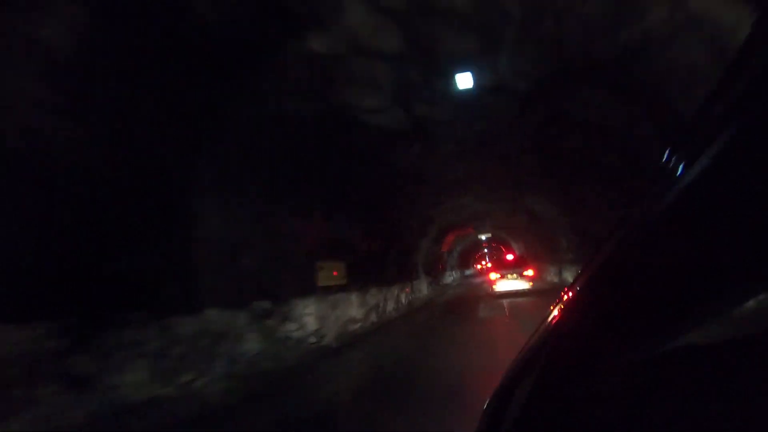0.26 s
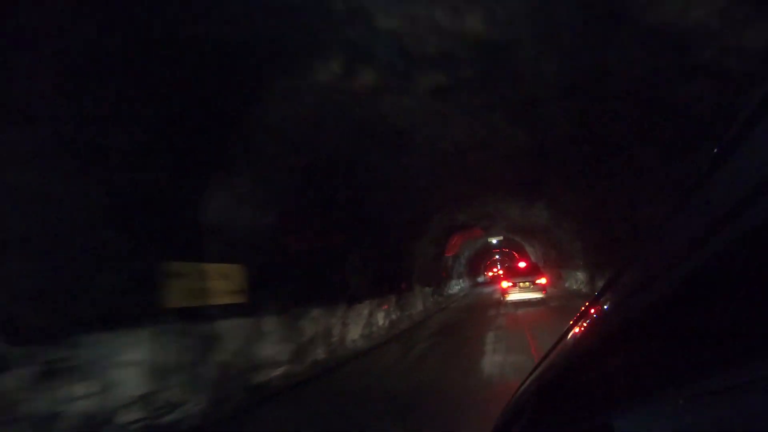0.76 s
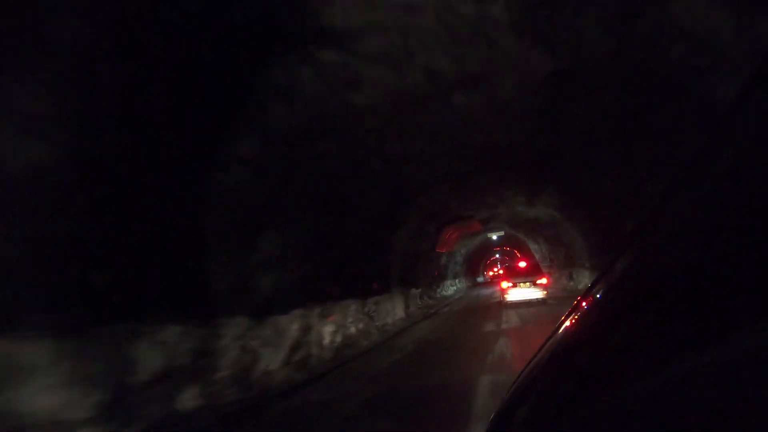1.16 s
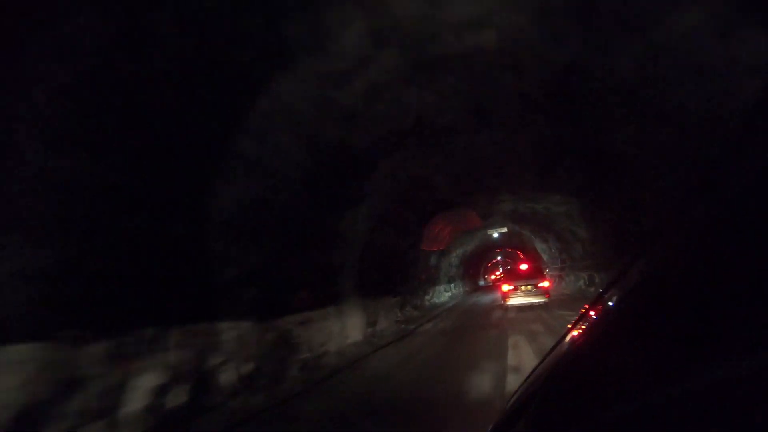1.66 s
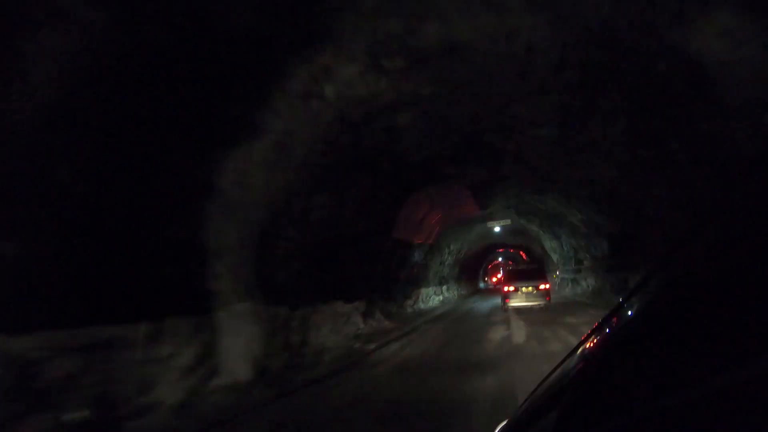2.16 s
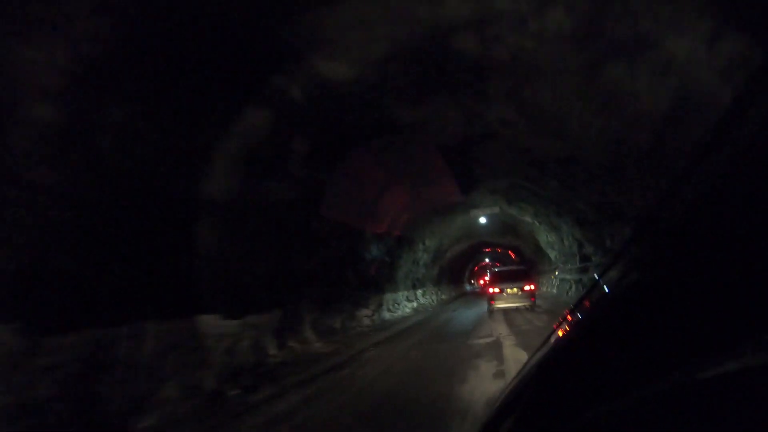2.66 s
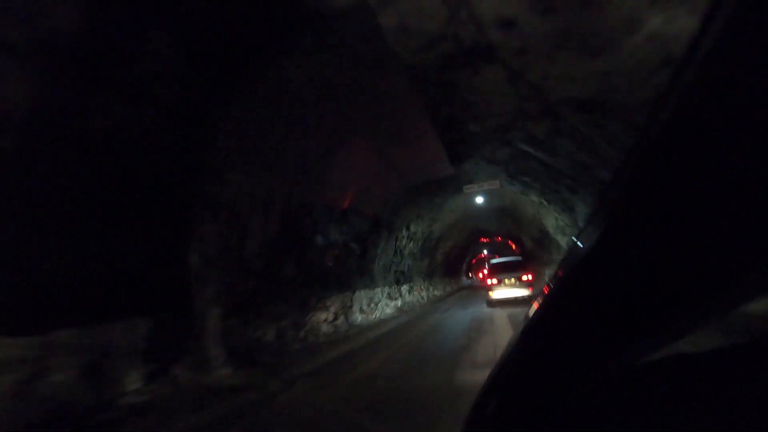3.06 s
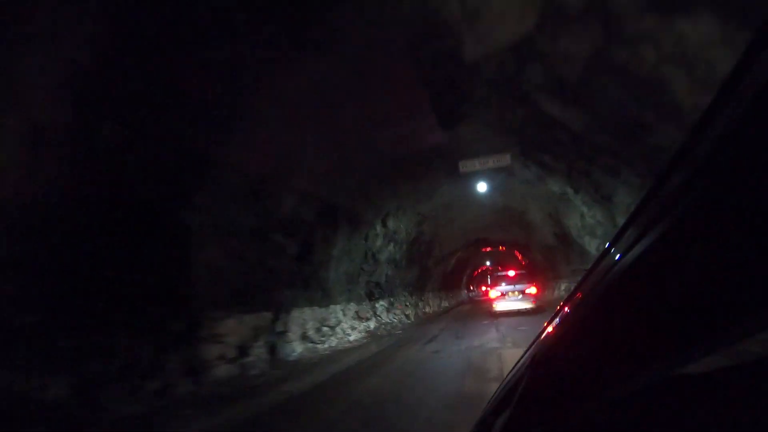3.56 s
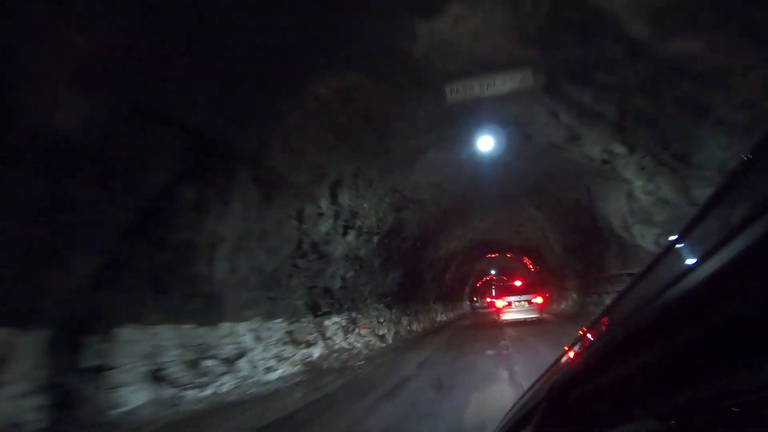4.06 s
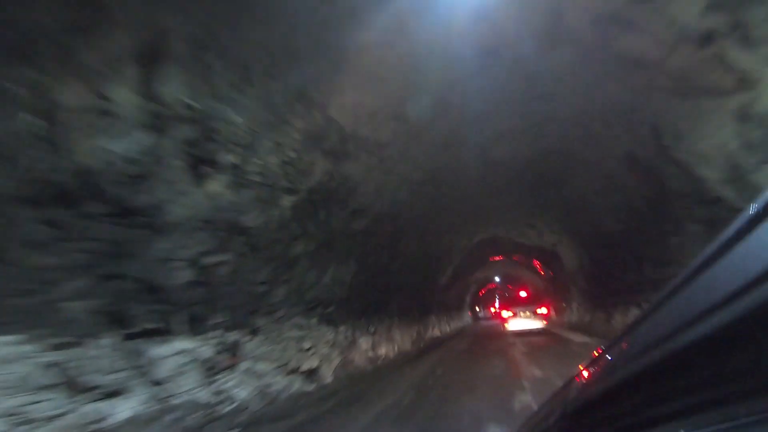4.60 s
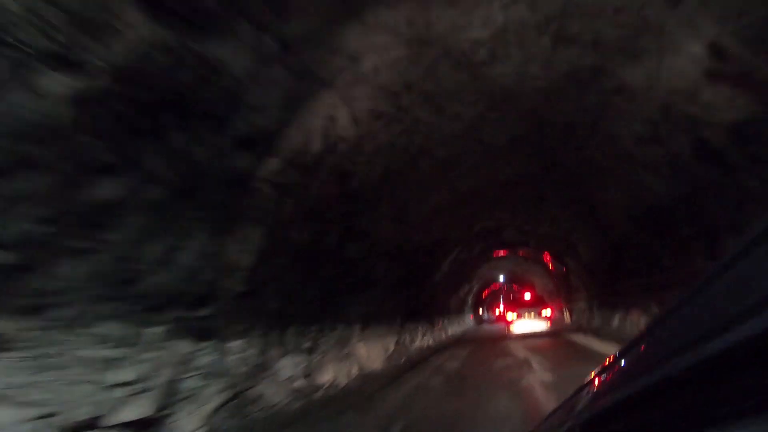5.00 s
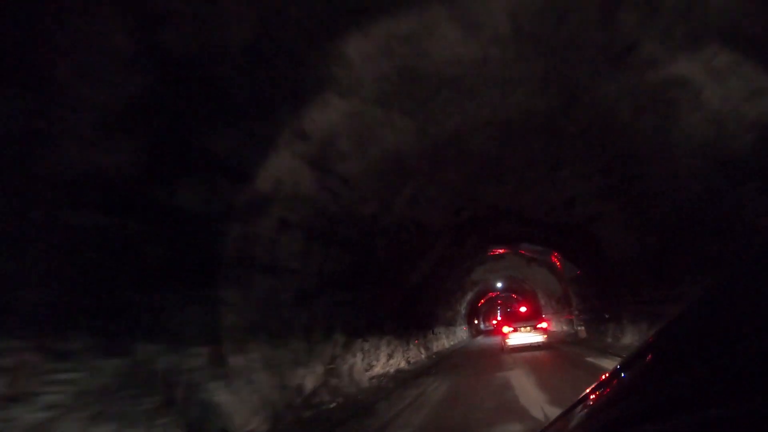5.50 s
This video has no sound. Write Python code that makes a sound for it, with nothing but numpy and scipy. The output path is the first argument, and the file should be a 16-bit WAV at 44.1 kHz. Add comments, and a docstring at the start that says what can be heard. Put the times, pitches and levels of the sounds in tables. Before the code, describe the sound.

Wind rumbles and flutters on a microphone held out of a car's side window, with irregular gusts landing as low slaps. Beneath it, tyre and engine noise blend into a smooth, steady roar inside a rock tunnel, stronger on the right. Water hisses softly under the wheels, and a few faint ticks of grit and spray hit the body. A thin, high whistle comes and goes.

```python
"""Wind buffets the two microphone ports of a small camera held out of a car's side window.
The car rolls slowly through a wet rock tunnel: the walls diffuse tyre and engine roar, water
hisses under the wheels, and grit and spray strike the body. A thin whistle from the drive train
comes and goes. The camera body shades the left port. Stereo pairs are ordered left, right;
pan is the left level minus the right."""
import sys
import numpy as np
from scipy import signal
from scipy.fft import rfft, irfft
from scipy.io import wavfile
from scipy.ndimage import uniform_filter1d

SR = 44100
rng = np.random.default_rng(int(sys.argv[2]) if len(sys.argv) > 2 else 0)


def output_pcm(signal):
    """Save a mono or channel-first signal as 16-bit PCM at the path in sys.argv[1].

    Samples are clipped to [-1, 1] before scaling.
    """
    pcm = np.clip(np.atleast_2d(signal).T, -1, 1) * 32767
    wavfile.write(sys.argv[1], SR, np.round(pcm).astype(np.int16))


N = 253134
TIME = np.arange(N) / SR
HZ = np.fft.rfftfreq(N, 1 / SR) + 1e-9

# grit and spray flung against the body: t/s, grit level/dB, grit pan/dB, spray level/dB
THROWS = [(0.5205, -40, 0, -60), (0.5265, -46, 0, -70), (0.692, -50, 0, -66), (0.94, -52, 0, -64),
          (1.088, -52, 0, -67), (1.232, -52, 0, -67), (1.755, -52, 0, -68), (4.1234, -54, 4, -85),
          (4.7294, -49, -2.5, -73), (5.1557, -50, -4.0, -62), (5.5144, -50, -2, -66)]


def from_db(db):
    """Amplitude ratio: a factor of ten for every 20 dB."""
    return 10 ** (np.asarray(db) / 20)


def in_time(rows):
    """Linear interpolation of each column over t/s, one value a sample."""
    times, *columns = np.transpose(rows)
    return [np.interp(TIME, times, column) for column in columns]


def in_frequency(rows):
    """Interpolation of each column over the logarithm of f/Hz, one value a bin."""
    hz, *columns = np.transpose(rows)
    return [np.interp(np.log(HZ), np.log(hz), column) for column in columns]


def drift(rate_hz):
    """Random modulation: low-passed noise of unit standard deviation."""
    slow = irfft(rfft(rng.standard_normal(N)) / (1 + (HZ / rate_hz) ** 2), N)
    return slow / np.std(slow)


def swells(times, peaks_db, width_s):
    """Superposition of Gaussian envelopes."""
    return sum(from_db(db) * np.exp(-((TIME - at) / width_s) ** 2) for at, db in zip(times, peaks_db))


def resonance(hz, width_hz):
    """Lorentzian curve: the gain of a resonance passed twice."""
    return 1 / (1 + (2 * (HZ - hz) / width_hz) ** 2)


def port_noise(spectrum, pan_db, coherence, left_lag_rad=0):
    """Partially coherent noise at the two ports; the mean of the pair has rms 1."""
    shared, own = rfft(rng.standard_normal((2, N)))
    coherence = np.clip(coherence, 0, 1)
    left = coherence * shared * np.exp(-1j * left_lag_rad) + np.sqrt(1 - coherence ** 2) * own
    pair = irfft(spectrum * np.array([from_db(pan_db) * left, shared]), N)
    return pair / np.std(pair.mean(axis=0))


def evened(pair, window_s):
    """Compression: dividing by a running rms reduces the chance swells of a noise."""
    window = int(window_s * SR)
    power = uniform_filter1d(uniform_filter1d(pair.mean(axis=0) ** 2, window), window)
    return pair / np.sqrt(power + 0.12)


def puff():
    """Narrow-band noise: a brief soft hiss, nearly in antiphase at the two ports."""
    # the hiss band: start t/s, end t/s, f/Hz, width/Hz, level/dB
    bands = [(3.49, 3.62, 7900, 550, -63)]
    out = np.zeros((2, N))
    for start, end, hz, width_hz, db in bands:
        progress = np.clip((TIME - start) / (end - start), 0, 1)
        swell = np.sqrt(np.clip(np.sin(np.pi * progress), 0, 1))
        out += from_db(db) * swell * port_noise(resonance(hz, width_hz), 0, 0.8, left_lag_rad=2.4)
    return out


def grit():
    """Impulse response: each grain sets the damped modes of a body panel ringing."""
    # panel modes: f/Hz, relative level/dB, T60/s
    modes = [(5500, -5, .015), (6600, -5, .01), (9800, -9, .006), (12300, -17, .004)]
    times, peak_db, pan_db, _ = np.transpose(THROWS)
    out = np.zeros((2, N))
    for hz, mode_db, t60 in modes:
        impacts = np.zeros((2, N)) + 1e-18
        impacts[:, (times * SR).astype(int)] = from_db(peak_db + mode_db + np.outer([.5, -.5], pan_db))
        decay, angle = from_db(-60 / (t60 * SR)), 2 * np.pi * hz / SR   # per sample
        out += signal.lfilter([0, np.sin(angle)], [1, -2 * decay * np.cos(angle), decay ** 2], impacts)
    return out


def spray_envelope(t60_s=0.6):
    """Exponential decay: each throw starts a hiss at once, which then dies away."""
    return sum((TIME > at) * from_db(db - 60 * np.abs(TIME - at) / t60_s) for at, _, _, db in THROWS)


def drive_train_whistle():
    """Common amplitude modulation: breathy partials of narrow-band noise swell and flare together."""
    # partials: f/Hz, width/Hz, relative level/dB, pan/dB
    partials = [(3146, 23, 3, -14), (1574, 10, -3, -12), (3705, 8, -17, -10), (6050, 60, -27, -8)]
    # slow course of the whistle: t/s, level/dB
    course = [(0.0, -53.5), (0.45, -55.5), (0.85, -65), (1.05, -53.5), (1.6, -55), (1.8, -63), (2.2, -55),
              (2.5, -61), (2.85, -64), (3.15, -61), (3.48, -57), (3.72, -55), (3.88, -51), (4.03, -61),
              (4.3, -54), (4.45, -57.5), (4.68, -62), (5.05, -57), (5.3, -63), (5.74, -54)]
    # short flares: t/s, peak level/dB
    flares = [(0.73, -56), (1.21, -63), (2.65, -55), (3.378, -51), (3.582, -56), (3.632, -56), (3.815, -56),
              (4.085, -55), (4.165, -50), (4.495, -56), (4.595, -49), (4.745, -59), (4.845, -46.5),
              (4.935, -47), (5.13, -53), (5.27, -53)]
    tones = sum(from_db(db) * evened(port_noise(resonance(hz, width_hz), pan_db, 0.41), window_s=0.021)
                for hz, width_hz, db, pan_db in partials)
    wavering = from_db(in_time(course)[0] + 1.5 * drift(rate_hz=8.8))
    return (wavering + swells(*np.transpose(flares), width_s=0.021)) * tones


def water_hiss(sheen_edge_hz=8500, flicker_db=1.5):
    """Broadband noise of the tearing water film; its top treble, the sheen, flickers."""
    # hiss at the ports: f/Hz, relative right level/dB, pan/dB, coherence, left lag/rad
    bands = [(4400, -0.2, -2.5, 0.52, 0.6), (5000, 0.0, -5.4, 0.58, 2.2), (6300, -3.1, -5.7, 0.35, 2.0),
             (7500, -6.6, -0.3, 0.56, 1.9), (8600, -14.7, 1.0, 0.71, 3.2), (10000, -14.1, -0.9, 0.45, 3.5),
             (11500, -23.0, -3.2, 0.2, 0.3), (13000, -28.0, -5.5, 0.35, 0.1), (14300, -37.0, -6, 0.2, 0.2)]
    # sheen against the rest of the hiss: t/s, relative level/dB
    sheen_course = [(0.0, 0), (0.6, 2.5), (1.9, 1.5), (2.9, -3.5), (3.6, -.6), (4.3, -2.5), (4.9, 0),
                    (5.74, -.6)]
    right_db, *ports = in_frequency(bands)
    hiss = port_noise(from_db(right_db) / np.sqrt(1 + (4500 / HZ) ** 24), *ports)
    sheen = irfft(rfft(hiss) / (1 + (sheen_edge_hz / HZ) ** 12), N)
    sheen_gain = from_db(in_time(sheen_course)[0] + flicker_db * drift(rate_hz=7.0))
    return hiss + (sheen_gain - 1) * sheen


def tunnel_roar(wetness_db, wet_edge_hz=3000):
    """Diffuse reflection smears tyre and engine sound to smooth noise, brighter on wetter road."""
    # roar at the ports: f/Hz, relative right level/dB, pan/dB, coherence, left lag/rad
    bands = [(430, -2.1, -1.4, 0.66, 0.1), (600, -3.3, 0.2, 0.82, 0.6), (770, -0.9, -4.9, 0.84, 1.2),
             (880, 0.0, -9.8, 0.61, 1.3), (980, -0.2, -8.9, 0.09, 1.0), (1100, -2.3, -10.4, 0.6, -0.9),
             (1350, -3.8, -9.0, 0.82, -0.3), (1550, -6.9, -8.3, 0.79, -0.5), (1750, -12.7, -4.8, 0.7, -0.2),
             (2050, -10.5, -4.8, 0.89, 0.3), (2400, -13.2, -7.7, 0.72, 0.4),
             (2800, -17.1, -11.5, 0.39, 0.1), (3300, -20.5, -6.6, 0.41, -1.3),
             (3800, -25.9, -5.4, 0.7, -0.7), (4400, -31.6, -2.5, 0.52, 0.6)]
    right_db, *ports = in_frequency(bands)
    band_pass = 1 / np.sqrt((1 + (330 / HZ) ** 6) * (1 + (HZ / 4500) ** 24))
    roar_colour = (1 + 0.2 * resonance(2250, 700) + 0.073 * resonance(860, 400)   # two broad peaks
                   + 0.3 * resonance(2975, 80) - 0.15 * resonance(1690, 150))   # a faint ring, a dip
    roar = port_noise(from_db(right_db) * band_pass * roar_colour, *ports)
    treble = irfft(rfft(roar) / (1 + (wet_edge_hz / HZ) ** 6), N)
    return roar + (from_db(wetness_db) - 1) * treble


def tyres():
    """Rolling noise: a nearly steady roar, and hiss in uneven bursts as the water film tears."""
    # rolling on wet road: t/s, roar level/dB, hiss level/dB
    rolling = [(0.0, -29.5, -57), (0.3, -29.5, -57), (0.5, -27.5, -55.5), (0.85, -29, -57),
               (1.1, -28, -57.5), (1.32, -27, -56.5), (1.6, -28, -58.5), (1.95, -28, -57),
               (2.4, -28.5, -57), (2.8, -28, -54.5), (3.1, -28, -57.5), (3.4, -26, -59), (4.0, -27.5, -59),
               (4.4, -28, -61.5), (4.84, -26.5, -60.5), (5.1, -26.5, -61), (5.74, -27, -59.5)]
    roar_db, hiss_db = in_time(rolling)
    roar = tunnel_roar(wetness_db=hiss_db - hiss_db.mean())
    hiss = water_hiss()
    roar_gain = from_db(roar_db + 0.48 * drift(rate_hz=7.9))
    hiss_gain = from_db(hiss_db + 0.71 * drift(rate_hz=21)) + spray_envelope()
    return roar_gain * roar + hiss_gain * hiss


def gusts(swell_s=0.028, slap_s=0.004):
    """Pressure transients: each gust is a slap of a few cycles inside a swell of brighter turbulence."""
    # gusts on the ports: t/s, turbulence level/dB, pan/dB, slap level/dB, slap f/Hz
    arrivals = [(0.146, -21.5, -3, -22, 213), (0.198, -28.5, -8, -16.5, 194), (0.356, -23, 11, -16, 247),
                (0.434, -20, -2, -8, 183), (0.612, -31, -8, -19, 226), (0.705, -21, -2, -17, 192),
                (1.14, -29.5, -2, -11.5, 233), (1.838, -46, -4, -10.5, 197), (2.005, -21.5, -5, -16, 244),
                (2.22, -30, -4, -16.5, 235), (2.338, -25, 14, -19, 227), (2.57, -31, 0, -12, 241),
                (2.972, -32, -4, -12, 174), (3.209, -25, -4, -16, 231), (3.402, -21.5, 0, -19, 242),
                (3.517, -23.5, -5, -17, 213), (3.647, -32, -7, -24, 310), (3.955, -32, 9, -17.5, 222),
                (4.036, -33, -7, -17.5, 263), (4.094, -33, 3, -8.5, 245), (4.174, -40, 4, -13, 194),
                (4.479, -24, 0, -18, 210), (4.979, -29, -7, -10.5, 199), (5.268, -19.5, -3, -25, 197),
                (5.455, -36, -1, -12, 216), (5.582, -35, -5, -12.5, 204)]
    # turbulence in a gust: f/Hz, relative level/dB
    spectrum = [(60, -23), (150, 4.5), (230, -10), (400, -8), (700, -22), (1200, -27), (4000, -100)]
    slaps = np.zeros((2, N))
    for at, _, pan_db, slap_db, hz in arrivals:
        cycles = np.cos(2 * np.pi * (hz * (TIME - at) + rng.random()))
        slaps += from_db([[pan_db / 2], [-pan_db / 2]]) * swells([at], [slap_db], slap_s) * cycles
    times, levels_db, pans_db, _, _ = np.transpose(arrivals)
    envelopes = np.array([swells(times, levels_db + side * pans_db, swell_s) for side in (.5, -.5)])
    turbulence = port_noise(from_db(in_frequency(spectrum)[0]), pan_db=0, coherence=0.91)
    return slaps + envelopes * evened(turbulence, window_s=0.0093)


def wind():
    """Turbulent pressure: large eddies press on both ports alike, small ones break mainly on the left."""
    # spectra of deep buffeting, flutter and small eddies: f/Hz, relative level/dB
    buffet_bands = [(8, -14), (16, -4.5), (26, 1.5), (50, 0), (75, -3), (110, -16), (200, -45), (600, -110)]
    flutter_bands = [(20, -39), (40, 4.5), (70, 1.5), (95, 3), (130, 2.5), (170, -3), (260, -6.5),
                     (340, -12), (450, -24), (800, -57.5), (3000, -100)]
    eddy_bands = [(30, -36.5), (80, -11.5), (200, 8.5), (450, -19), (700, -9.5), (1000, -18), (1600, -51),
                  (4000, -100)]
    # airflow on the ports: t/s, buffet level/dB, flutter level/dB
    airflow = [(0.0, -21, -21), (0.3, -17, -23), (0.65, -23, -18), (0.9, -22, -20), (1.07, -27, -25),
               (1.25, -20, -20.5), (1.7, -26.5, -20.5), (2.05, -16, -24), (2.16, -27, -22),
               (2.35, -19.5, -18), (2.85, -18.5, -24.5), (3.08, -21.5, -26.5), (3.4, -23, -19.5),
               (3.8, -22, -22), (4.2, -18.5, -21), (4.5, -26, -20), (4.7, -23, -21.5), (4.95, -21.5, -21.5),
               (5.4, -20.5, -20), (5.74, -24.5, -16)]
    # the heaviest lumps of air: t/s, buffet peak level/dB, flutter peak level/dB
    lumps = [(0.25, -28, -40), (0.362, -34, -19), (0.44, -33, -29), (0.575, -17, -24), (0.66, -33, -25),
             (1.31, -20, -29), (1.49, -20, -30), (1.64, -30, -20.5), (1.9, -32, -35), (1.967, -28, -18),
             (2.07, -29, -18.5), (2.21, -25, -29), (2.336, -42, -25), (2.595, -20, -29), (2.706, -36, -34),
             (2.768, -30, -29), (2.862, -26, -18.5), (3.21, -26, -24), (3.41, -26, -21), (3.584, -32, -27),
             (3.66, -15.5, -30), (3.717, -30, -29), (3.921, -33, -20.5), (4.04, -19.5, -30),
             (4.257, -26, -30), (4.84, -19, -27), (4.92, -19, -38), (4.98, -34, -26), (5.135, -37, -25),
             (5.287, -28, -20.5), (5.5, -25, -38), (5.654, -32, -31)]
    buffet = port_noise(from_db(in_frequency(buffet_bands)[0]), pan_db=-1.2, coherence=0.93)
    flutter = port_noise(from_db(in_frequency(flutter_bands)[0]), pan_db=-1.1, coherence=0.88)
    eddies = port_noise(from_db(in_frequency(eddy_bands)[0]), pan_db=8.3, coherence=0.39)
    buffet_db, flutter_db = in_time(airflow)
    times, thump_db, shake_db = np.transpose(lumps)
    buffet_gain = from_db(buffet_db + 1.26 * drift(rate_hz=14)) + swells(times, thump_db, width_s=0.021)
    flutter_gain = from_db(flutter_db + 1.5 * drift(rate_hz=12)) + swells(times, shake_db, width_s=0.022)
    eddy_gain = from_db(-42.5 + 4.3 * drift(rate_hz=4.4))
    return (buffet_gain * evened(buffet, window_s=0.029)
            + flutter_gain * evened(flutter, window_s=0.041)
            + eddy_gain * eddies)


def scene():
    """Superposition: the pressures of all sources add at each port."""
    return wind() + gusts() + tyres() + drive_train_whistle() + grit() + puff()


def record(dry):
    """Soft saturation rounds the peaks; a steep low-pass filter cuts the top treble."""
    stopband_hz = 14900
    low_pass = signal.cheby2(12, 60, stopband_hz, fs=SR, output="sos")
    return signal.sosfilt(low_pass, np.tanh(dry))


dry = scene()
out = record(dry)
output_pcm(out)
```